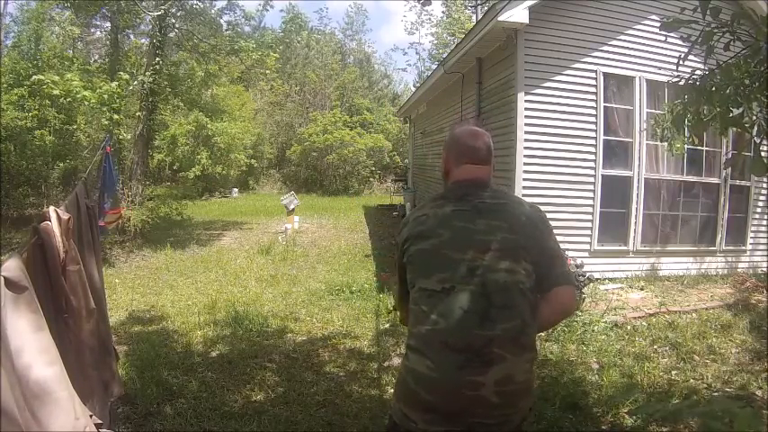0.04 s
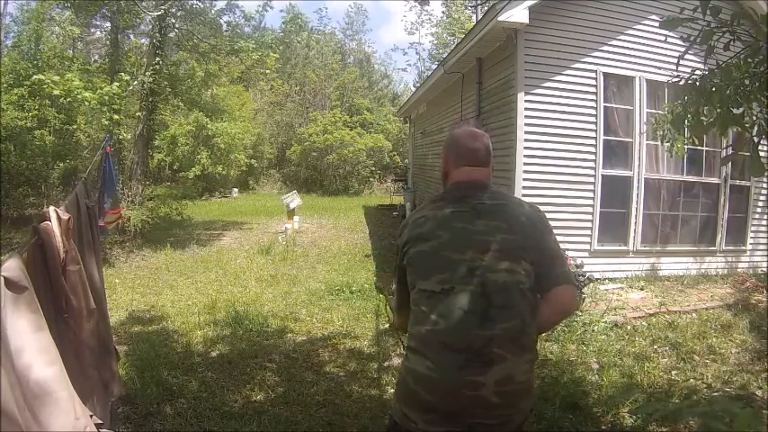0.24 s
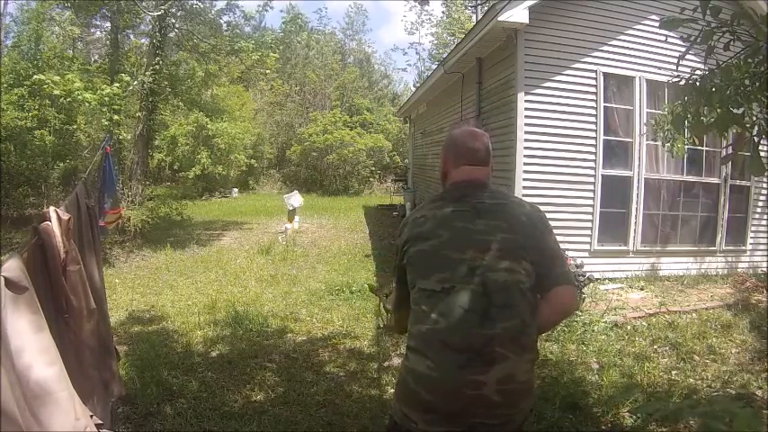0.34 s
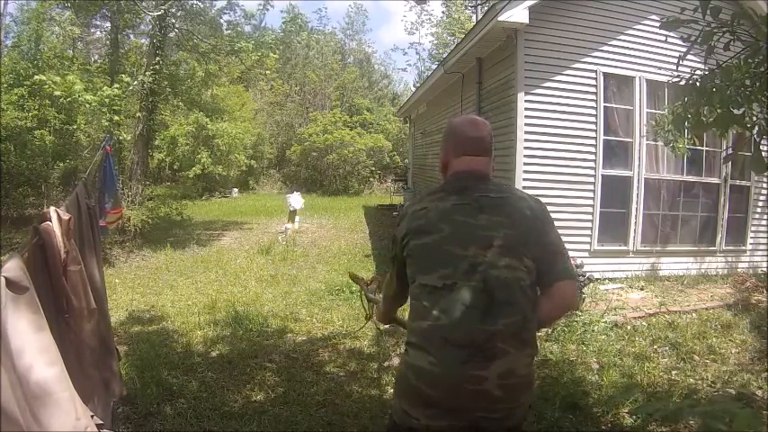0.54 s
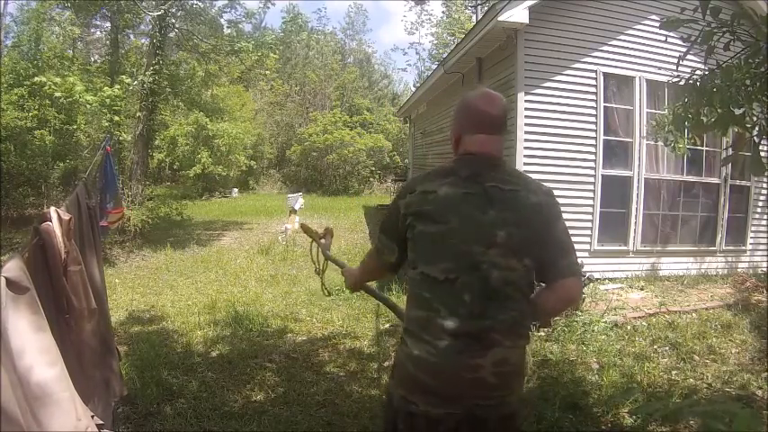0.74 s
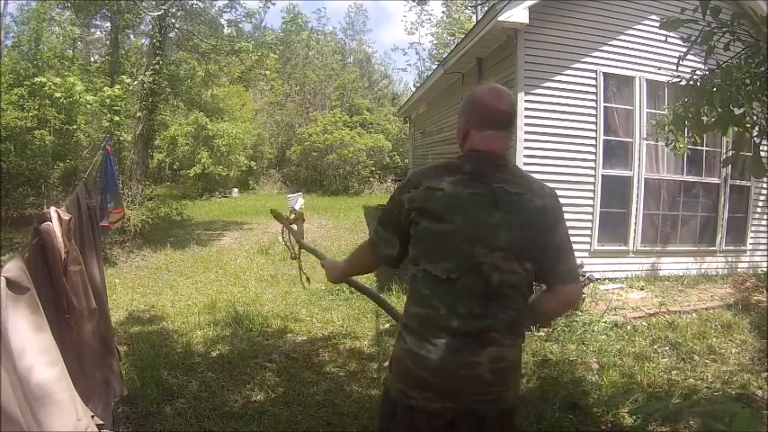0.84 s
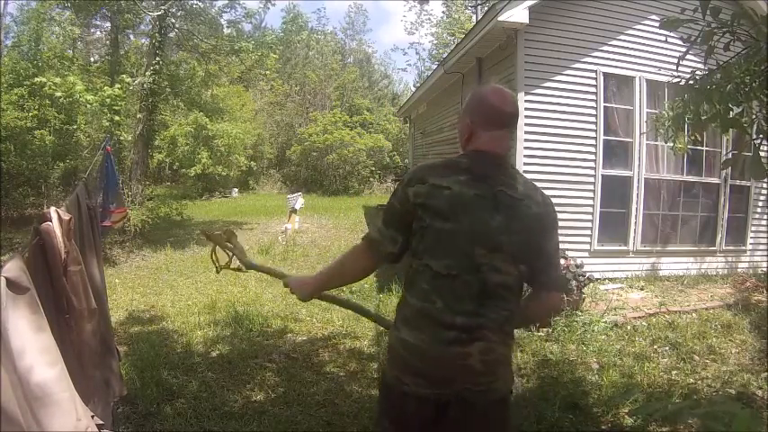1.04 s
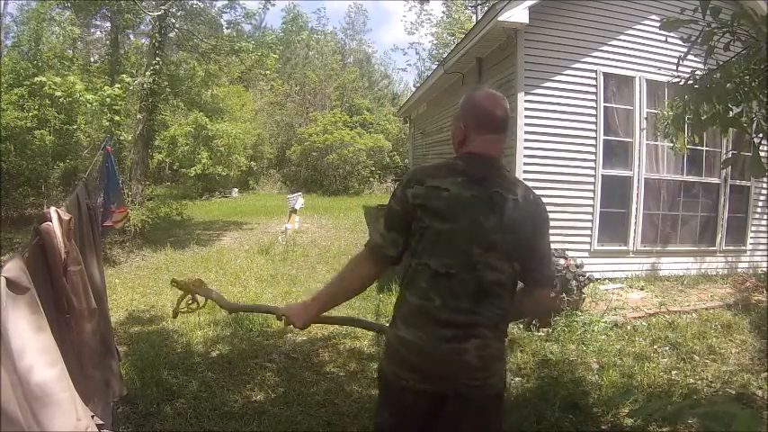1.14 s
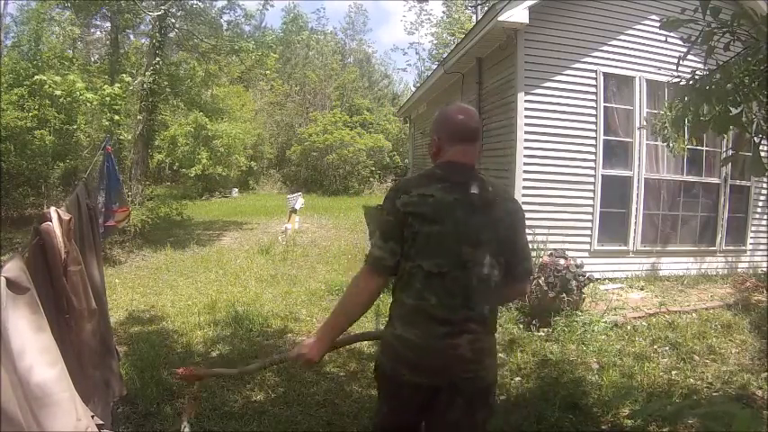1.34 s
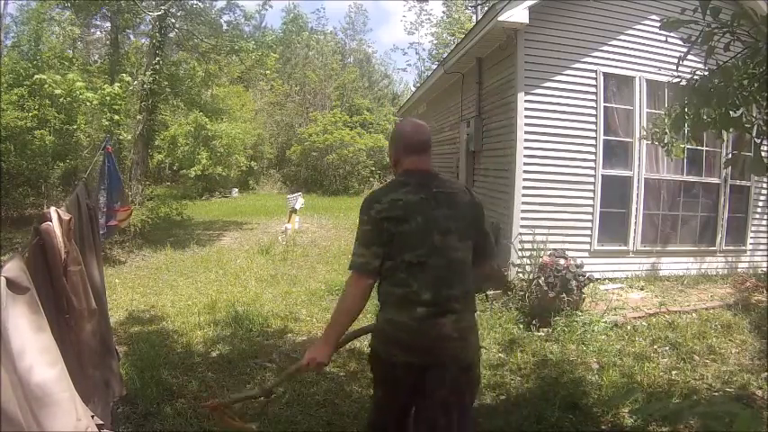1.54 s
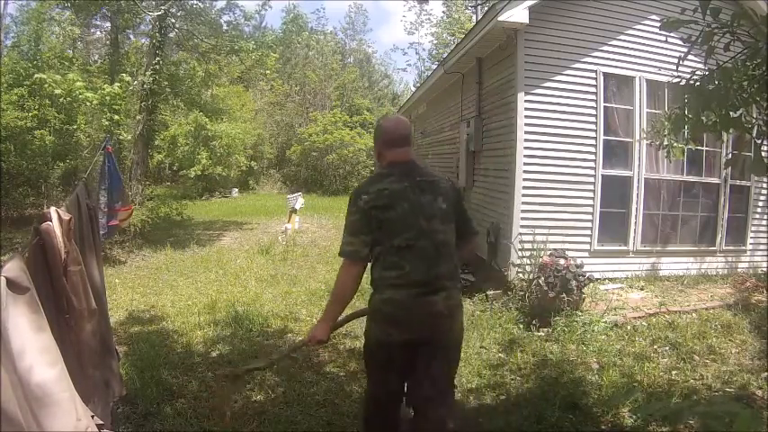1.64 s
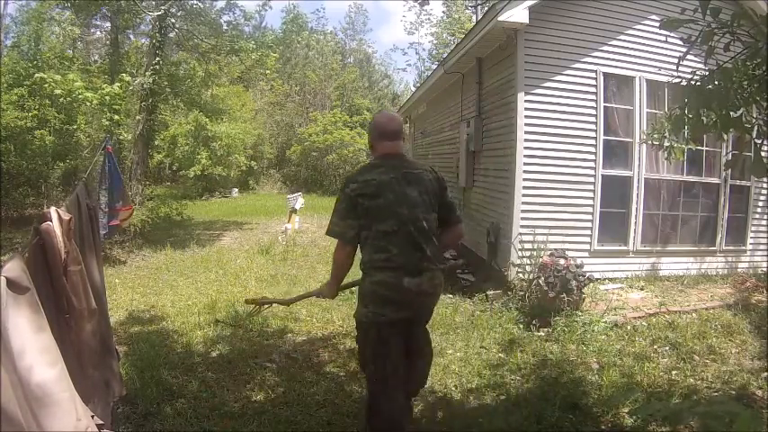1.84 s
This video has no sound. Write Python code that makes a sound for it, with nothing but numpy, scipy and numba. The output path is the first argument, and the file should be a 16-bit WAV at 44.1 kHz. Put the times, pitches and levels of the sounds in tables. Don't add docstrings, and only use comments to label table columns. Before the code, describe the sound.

One hard crack of a rubber-band crossbow outdoors, with low wind rumble and faint birds.

```python
import sys
import numpy as np
from scipy import signal
from scipy.fft import rfft, irfft
from scipy.io import wavfile
from scipy.ndimage import uniform_filter1d
from numba import njit

SR = 44100
rng = np.random.default_rng(int(sys.argv[2]) if len(sys.argv) > 2 else 0)


def convert_level_to_amplitude(level_db):
    exponent = np.asarray(level_db, float) / 20
    return 10 ** exponent


def inscribe(sig):
    pcm = np.round(np.clip(np.atleast_2d(sig).T, -1, 1) * 32767)
    wavfile.write(sys.argv[1], SR, pcm.astype(np.int16))


N = 83790

SNAP_S = .23603

# pitch_hz, level_db, t60_s, first_swing (+1 or -1)
STOCK_MODES = [(325, 3.6, .0073, 1), (627, 4.2, .0154, 1), (918, 6.4, .0167, -1), (1115, -14, .04, -1),
               (1520, -14.7, .035, -1), (1721, -5.5, .0116, 1), (2082, -3.9, .0106, -1),
               (2600, -13, .011, 1), (3530, -15, .016, 1), (4150, -15, .009, -1), (4850, -28, .01, 1),
               (7100, -30, .01, 1), (9500, -32, .008, -1)]
# delay_s, level_db
SLAP_RETURNS = [
    (.0036, -11.8),
    (.0071, -17),
]
# freq_hz, level_db
SCATTER_COLOUR = [(210, -61.5), (350, -24.5), (579, -2), (1190, 2), (1820, -12.5), (3060, -22), (3530, -24),
                  (3940, -23.5), (15000, -38)]
# centre_hz, width_hz, gain_db
SCATTER_PEAKS = [(300, 120, 9), (600, 79, -1.5), (2100, 900, 3.5), (3560, 240, 14.5), (5850, 1180, 5),
                 (6900, 900, 6.5)]
# centre_s, length_s, level_db, low_edge_hz
RUSTLE_SWELLS = [(.008, 0.05, -45, 254), (0.048, 0.1, -58.5, 810), (0.47, 0.3, -60.5, 4960),
                 (0.67, 0.052, -67, 5000), (0.604, 0.059, -62.5, 4500), (0.749, 0.046, -58.5, 6000),
                 (0.792, 0.086, -65, 5000), (1.44, 0.051, -65, 4930), (1.522, 0.019, -65, 5000),
                 (1.552, 0.032, -56.5, 700), (1.635, 0.051, -67, 5000), (1.72, 0.059, -63, 5100),
                 (1.82, 0.09, -68, 6040), (1.9, 0.054, -55, 300)]
# freq_hz, level_db
RUSTLE_COLOUR = [(200, 11), (1300, -3.5), (4000, -13), (9000, -19.5), (12000, -21.5), (16000, -36)]
# start_s, length_s, from_hz, to_hz, level_db
BIRD_NOTES = [(.04, .1, 2680, 2530, -66), (.16, .035, 2600, 2650, -61), (.195, .035, 2680, 2660, -60),
              (.77, .07, 2750, 2720, -66), (.86, .03, 3600, 3100, -68), (.885, .12, 2750, 2720, -66),
              (1.13, .07, 2450, 2450, -67), (1.43, .04, 2600, 2450, -68), (1.62, .025, 3550, 3300, -68),
              (1.514, .02, 2750, 2400, -63), (1.53, .03, 2380, 2330, -61), (1.582, .04, 2300, 3650, -60),
              (1.805, .02, 2750, 2400, -63), (1.82, .025, 2360, 2330, -59), (1.87, .04, 2350, 3700, -59.5),
              (.09, .07, 10000, 10050, -84), (.17, .05, 10050, 10100, -82)]
# centre_hz, width_hz, level_db
LEAF_BANDS = [(260, 220, -63), (1300, 390, -65), (2720, 440, -71)]
# time_s, level_db
WIND_GUSTS = [(0, -37.5), (.1, -49.5), (.2, -39.5), (.24, -49.5), (.29, -50), (.348, -39.5), (.634, -39.5),
              (.73, -47.5), (.766, -39.5), (.82, -45.5), (1.025, -42.5), (1.068, -48.5), (1.386, -52.5),
              (1.6, -44), (1.75, -37.5), (1.785, -52.5), (1.845, -36), (1.9, -46)]
# time_s, level_db
TRAFFIC_RUMBLE = [(0, -39.5), (.2, -39.5), (.3, -49), (.45, -37), (.55, -56), (.75, -44), (1.2, -52),
                  (1.9, -39.5)]
# freq_hz, level_db
AIR_COLOUR = [(120, -23), (200, -12), (503, -6.5), (734, -8.5), (1020, -6), (1910, -18), (2420, -12.5),
              (3010, -17.5), (15000, -39.5)]
# centre_hz, width_hz, gain_db
AIR_PEAKS = [(3420, 540, 0.5), (5750, 810, 13), (9480, 2700, 7.5)]


def level(x, db):
    return x * convert_level_to_amplitude(db) / np.sqrt(np.mean(x ** 2))


def white():
    return rng.standard_normal(N)


def colour(x, points, peaks=()):
    f = np.arange(len(x) // 2 + 1) * SR / len(x) + 1
    hz, db = np.array(points).T
    gain_db = np.interp(np.log(f), np.log(hz), db)
    for centre, width, peak_db in peaks:
        gain_db = gain_db + peak_db / (1 + (2 * (f - centre) / width) ** 2)
    return irfft(rfft(x) * convert_level_to_amplitude(gain_db), len(x))


def walk(rate):
    hold = int(SR / rate)
    steps = np.repeat(rng.standard_normal(N // hold + 1), hold)
    return 1.2 * uniform_filter1d(uniform_filter1d(steps, hold), hold)[:N]


def ring(age, hz, db, t60):
    a = np.maximum(age, 0)
    return convert_level_to_amplitude(db - 60 * a / t60) * np.sin(2 * np.pi * hz * a)


def high(x, hz):
    return signal.sosfilt(signal.butter(2, min(hz, 15000), "high", fs=SR, output="sos"), x)


@njit
def lowpass(x, hz):
    y, band, low = np.empty(len(x)), 0., 0.
    for i in range(len(x)):
        g = np.tan(np.pi * hz[i] / SR)
        v = (band + g * (x[i] - low)) / (1 + g * (g + 1.2))
        y[i] = low + g * v
        band, low = 2 * v - band, low + 2 * g * v
    return y


def garden_air():
    hush = colour(white(), [(60, -66.5)] + list(AIR_COLOUR), AIR_PEAKS)
    return level(hush, -57.5) * convert_level_to_amplitude(0.62 * walk(5))


def machine_hum(t):
    pitch_hz = 35 * (1 + .03 * walk(6))
    tone = np.sqrt(2) * np.sin(2 * np.pi * np.cumsum(pitch_hz) / SR)
    start_s, rise_s = 0.803, 0.027
    return tone * convert_level_to_amplitude(-41.5 + 1.5 * walk(4.3)) * np.clip((t - start_s) / rise_s, 0, 1)


def traffic(t):
    rumble = lowpass(lowpass(white(), 42 + 0 * t), 60 + 0 * t)
    return level(high(rumble, 18), 0) * convert_level_to_amplitude(np.interp(t, *np.array(TRAFFIC_RUMBLE).T))


def wind(t):
    gust_db = np.interp(t, *np.array(WIND_GUSTS).T)
    edge_hz = np.clip(90.2 + 2 * (gust_db + 44), 30, 400)
    buffet = high(lowpass(lowpass(white(), edge_hz), 2.36 * edge_hz), 39)
    return level(buffet, 2.3) * convert_level_to_amplitude(gust_db + 0.5 * walk(29.93))


def leaves():
    out = 0
    for hz, width, db in LEAF_BANDS:
        band = signal.lfilter(*signal.iirpeak(hz, hz / width, fs=SR), white())
        out = out + level(band, db) * convert_level_to_amplitude(3 * walk(35))
    return out


def birds(t):
    out = 0
    rough = 1 + .35 * walk(250)
    wobble = .55 * walk(400)
    for start, length, hz0, hz1, db in BIRD_NOTES:
        u = np.clip((t - start) / length, 0, 1)
        phase = 2 * np.pi * length * u * (hz0 + (hz1 - hz0) * u / 2)
        out = out + convert_level_to_amplitude(db) * np.sin(np.pi * u) ** 0.36 * np.sin(phase + wobble)
    smear_t60_s = .06
    smear = rng.standard_normal(4000) * convert_level_to_amplitude(-60 * t[:4000] / smear_t60_s)
    smear = smear / np.sqrt(np.sum(smear ** 2))
    return out * rough + convert_level_to_amplitude(-6) * signal.fftconvolve(out, smear)[:N]


def rustle(t):
    grains = colour(white() * convert_level_to_amplitude(2 * walk(220)), RUSTLE_COLOUR)
    out = 0
    for centre, length, db, edge_hz in RUSTLE_SWELLS:
        out = out + level(high(grains, edge_hz), db) * np.exp(-(2 * (t - centre) / length) ** 2)
    return out


def dart_knock(t):
    return ring(t - .6908, 1120, -35, .022)


def scatter(t):
    age = np.maximum(t - SNAP_S, 0)
    echoes_per_s = 12000
    taps = (rng.random(N) < echoes_per_s / SR) * white() * convert_level_to_amplitude(-2 * white())
    near = level(colour(taps, SCATTER_COLOUR, SCATTER_PEAKS), 0)
    hold_s, sag_db_s, fall_db_s = 0.12, 41.5, 169
    near_db = -26.5 - sag_db_s * age - fall_db_s * np.maximum(age - hold_s, 0) + .8 * walk(61.2)

    trees = level(colour(white(), SCATTER_COLOUR, SCATTER_PEAKS), 0)
    trees = high(signal.lfilter(*signal.butter(1, 7000, fs=SR), trees), 709)
    trees_t60_s = 1.57
    trees_db = -35.5 - 60 * age / trees_t60_s + 0.95 * walk(40)
    onset = np.clip((age - .003) / .004, 0, 1)
    return onset * (near * convert_level_to_amplitude(near_db) + trees * convert_level_to_amplitude(trees_db))


def slap(age):
    push_s = .0014
    modes = sum(swing * ring(age, hz, db, t60) for hz, db, t60, swing in STOCK_MODES)
    return np.clip(age / push_s, 0, 1) * modes


def snap(t):
    age = t - SNAP_S
    slaps = slap(age) + sum(convert_level_to_amplitude(db) * slap(age - delay) for delay, db in SLAP_RETURNS)

    noise = colour(white(), [(5500, -30), (7000, 0), (11500, -2), (14000, -20)])
    crack_t60_s = .013
    crack = noise * (age > .0002) * convert_level_to_amplitude(-22 - 60 * np.maximum(age, 0) / crack_t60_s)

    trigger_s, tick_t60_s = .2337, 0.0084
    tick = colour(noise, [(6000, -25.5), (10000, 26), (13000, -23.5)]) * (t > trigger_s)
    tick = tick * convert_level_to_amplitude(-53 - 60 * np.maximum(t - trigger_s, 0) / tick_t60_s)
    return slaps + crack + tick


def scene():
    t = np.arange(N) / SR
    air = garden_air()
    lows = machine_hum(t) + traffic(t) + wind(t)
    mid = air + lows + leaves() + birds(t) + rustle(t) + dart_knock(t) + scatter(t) + snap(t)
    side_hiss = convert_level_to_amplitude(-16.5) * np.roll(high(air, 3300), 900)
    side_low = convert_level_to_amplitude(-38) * np.roll(lows + 3 * air, 3000)
    side = side_hiss + side_low
    return np.array([mid + side, mid - side])


def low_pass(x):
    return signal.sosfilt(signal.butter(12, 15690, fs=SR, output="sos"), x)


def record(dry):
    ceiling, knee = 1.035, 14
    flat = dry / (1 + np.abs(dry / ceiling) ** knee) ** (1 / knee)
    notched = signal.lfilter(*signal.iirnotch(5750, 4, fs=SR), flat)
    cased = .3 * flat + .7 * notched
    soft = signal.sosfilt(signal.cheby1(6, .5, 14800, fs=SR, output="sos"), cased)
    return low_pass(soft)


dry = scene()
out = record(dry)
inscribe(out)
```